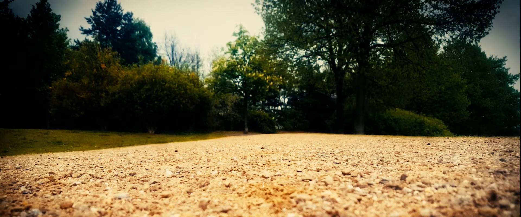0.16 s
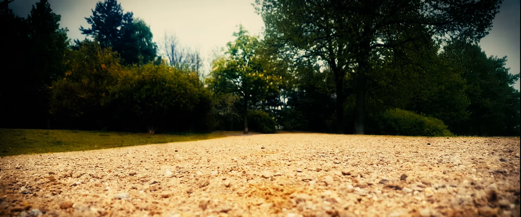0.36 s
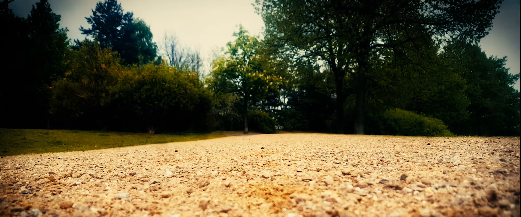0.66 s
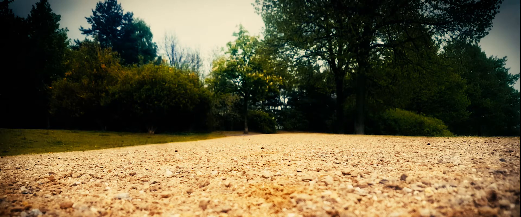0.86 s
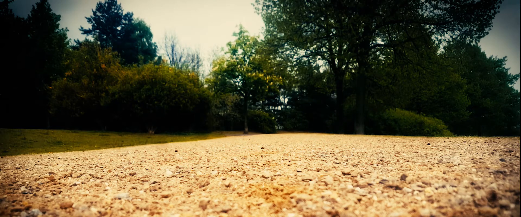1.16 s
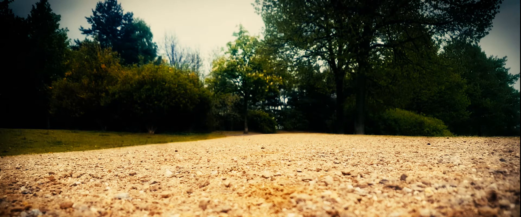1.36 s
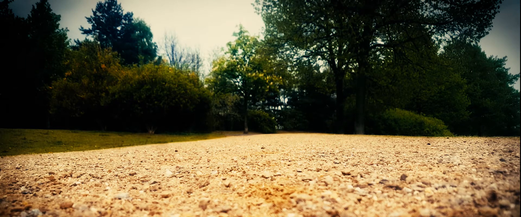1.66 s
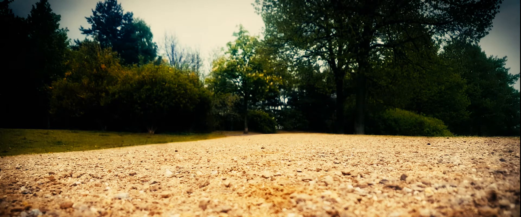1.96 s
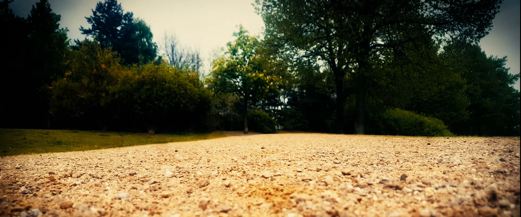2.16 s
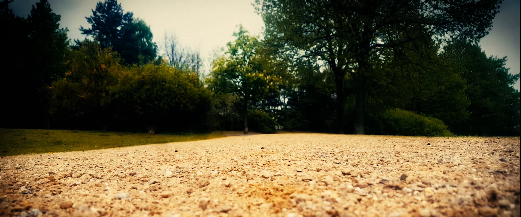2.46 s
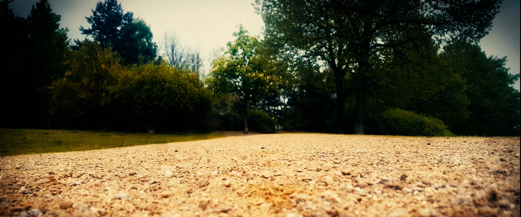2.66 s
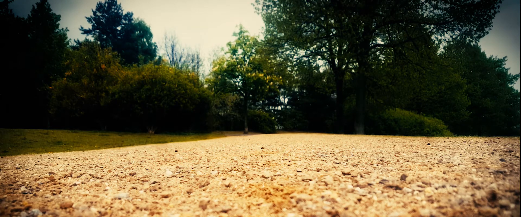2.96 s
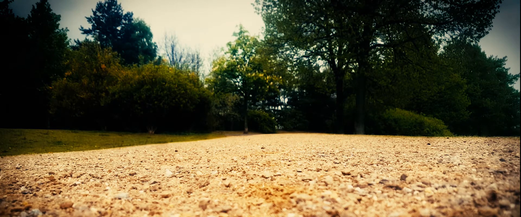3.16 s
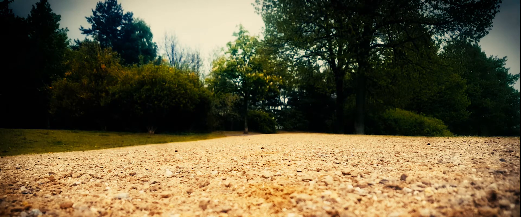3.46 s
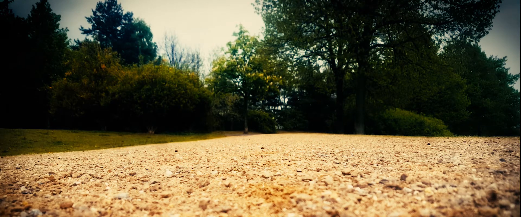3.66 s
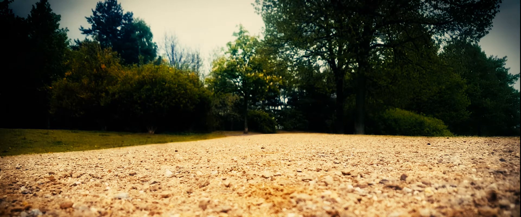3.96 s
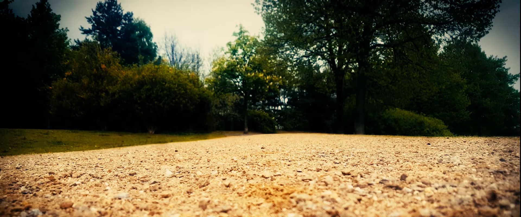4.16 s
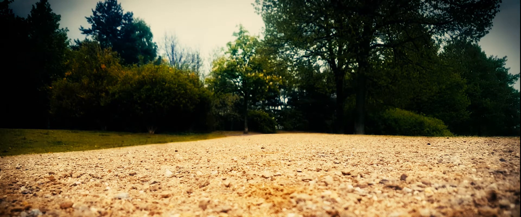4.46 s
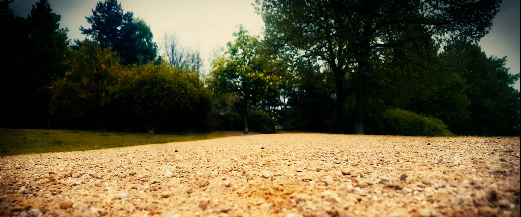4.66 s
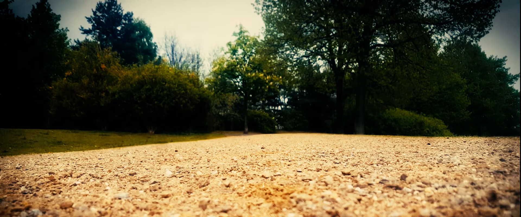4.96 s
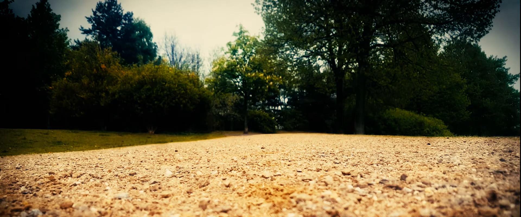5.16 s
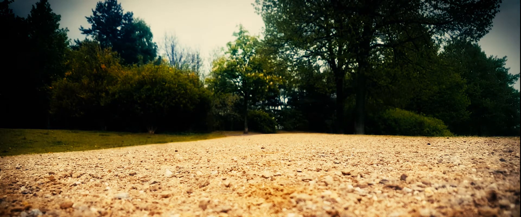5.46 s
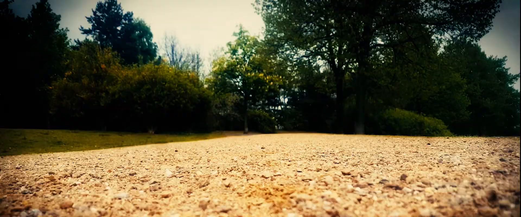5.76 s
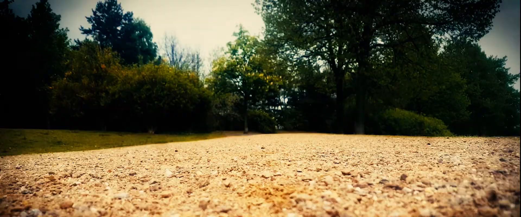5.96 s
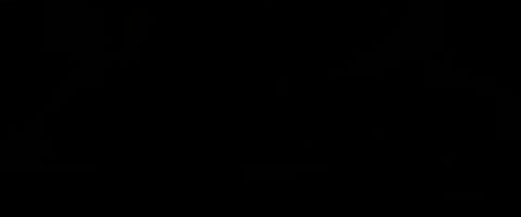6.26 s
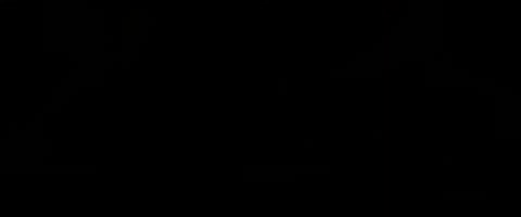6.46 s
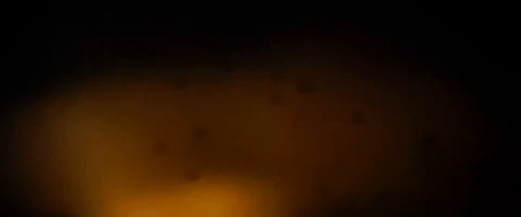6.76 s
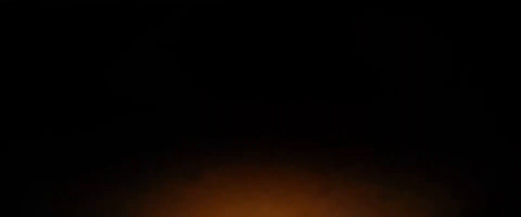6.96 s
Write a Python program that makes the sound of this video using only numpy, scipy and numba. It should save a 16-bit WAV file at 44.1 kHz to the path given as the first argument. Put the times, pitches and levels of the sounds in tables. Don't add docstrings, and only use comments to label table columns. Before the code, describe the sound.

Short rising gear whines and spraying grit in a quiet park, growing nearer until a loud thud and scraping, rattling tumble across pebbles.

```python
import sys
import numpy as np
from scipy import signal
from scipy.fft import rfft, irfft
from scipy.io import wavfile
from scipy.ndimage import uniform_filter1d, map_coordinates
from numba import njit

SR = 44100
rng = np.random.default_rng(int(sys.argv[2]) if len(sys.argv) > 2 else 0)


def linear_from_db(decibels):
    return 10 ** (np.asarray(decibels, float) / 20)


def int16_out(signal):
    q = np.round(np.clip(np.atleast_2d(signal).T, -1, 1) * 32767)
    wavfile.write(sys.argv[1], SR, q.astype(np.int16))


N = 313928
TIME = np.arange(N) / SR
TOP_HZ = 15950
HEAD_ON_S = 4.4
IMPACT_S = 6.045
BOTH_WAYS = np.array([[1], [-1]])


def rms_one(x):
    return x / np.sqrt(np.mean(x ** 2) + 1e-20)


def in_time(rows):
    s, *columns = np.transpose(rows)
    return [np.interp(TIME, s, c) for c in columns]


def since(start_s):
    return np.clip(TIME - start_s, 0, 1)


def gate(start_s, end_s, edge_s):
    return np.clip(np.minimum(TIME - start_s, end_s - TIME) / edge_s + .5, 0, 1)


def sides(pan_db):
    return linear_from_db(BOTH_WAYS * pan_db / 2)


def add(out, s, burst):
    i = round(s * SR)
    out[..., i:i + burst.shape[-1]] += burst[..., :N - i]


def sine(hz):
    return np.sqrt(2) * np.sin(2 * np.pi * np.cumsum(hz + np.zeros(N)) / SR)


def ringing(hz, t60, rise_s):
    t = np.arange(int(t60 * SR)) / SR
    return np.sin(2 * np.pi * hz * t) * linear_from_db(-60 * t / t60) * (1 - np.exp(-t / rise_s))


def drift(rate):
    r = np.exp(-40 * np.pi * rate / SR)
    slow = signal.lfilter([1], [1, -2 * r, r * r], rng.standard_normal(N // 20 + 2002))[2000:]
    return np.interp(np.arange(N) / 20, np.arange(len(slow)), rms_one(slow))


def grains(per_s, spread_db, clump_db, hiss, alike):
    clumps = linear_from_db(clump_db * drift(27))
    sizes = linear_from_db(spread_db * np.minimum(rng.exponential(1, (3, N)), 5))
    sizes = sizes * rng.choice([-1, 1], (3, N))
    clicks = rms_one(sizes * (rng.random((3, N)) < per_s * clumps / SR))
    shared, *own = clicks + hiss * clumps * rng.standard_normal((3, N))
    alike = np.clip(alike, 0, 1)
    return np.sqrt(alike) * shared + np.sqrt(1 - alike) * np.array(own)


@njit
def resonate(x, hz, r):
    out = np.zeros_like(x)
    for c in range(x.shape[0]):
        for i in range(2, x.shape[1]):
            push = x[c, i] - x[c, i - 2]
            out[c, i] = push + 2 * r * np.cos(2 * np.pi * hz[i]) * out[c, i - 1] - r * r * out[c, i - 2]
    return out


def narrow(x, hz, width_hz):
    r, cycles = np.exp(-np.pi * width_hz / SR), hz / SR + np.zeros(N)
    return rms_one(resonate(resonate(x, cycles, r), cycles, r))


# pitch in Hz, width in Hz, lift in dB.
SHELL_RINGS = [(1530, 270, 24.5), (2530, 330, 10), (4700, 610, 9.5), (5370, 240, 2), (6000, 170, 3),
               (6890, 810, 14), (9630, 280, 7), (12040, 350, 9.5), (14900, 810, 8)]


def shell_db(hz):
    return sum(db / (1 + ((hz - f) / width) ** 2) for f, width, db in SHELL_RINGS)


def colour(x, points, shell=0):
    hz = np.maximum(np.arange(N // 2 + 1) * SR / N, 1)
    f, db = np.transpose(points)
    shape = np.interp(np.log(hz), np.log(f), db, left=-200, right=-200)
    return rms_one(irfft(rfft(x) * linear_from_db(shape + shell * shell_db(hz)), N))


# time in seconds, drone level in dB, hum level in dB.
FAR_ENGINES = [(0.0, -32.5, -61), (0.73, -46, -53), (0.97, -40.5, -47.5), (1.85, -52, -58),
               (2.44, -45, -41.5), (2.51, -33.5, -42), (2.96, -34, -52.5), (4.41, -39, -47),
               (5.4, -46, -46), (5.6, -43, -60), (6.0, -35, -62), (6.5, -46, -62)]
# pitch in Hz, level in dB per Hz.
AIR_TONE = [(12, -50), (20, -17.5), (86, -1), (263, -6.5), (349, -12.5), (412, -10.5), (577, -11),
            (1500, -11.5), (2930, -46), (10600, -54), (14900, -50), (16200, -69)]


def park():
    drone_db, hum_db = in_time(FAR_ENGINES)
    far, near = grains(100, 1.4, 0.81, 30, 0.83), rng.standard_normal((2, N))
    low, high = (signal.butter(2, 2500, kind, fs=SR, output="sos") for kind in ("low", "high"))
    mixed = signal.sosfilt(low, rms_one(far)) + signal.sosfilt(high, near)
    air = colour(mixed, AIR_TONE) * linear_from_db(-43.0) * sides(1.6)
    drone_hz = 81 * (1 + 0.12 * drift(0.5))
    drone = narrow(rng.standard_normal((1, N)), drone_hz, 41.0) * linear_from_db(drone_db - 12.0)
    hum = narrow(rng.standard_normal((1, N)), 409.2, 6.1) * linear_from_db(hum_db - 6.5)
    return (air + drone + hum) * linear_from_db(np.interp(TIME, [6.0, 6.3, 7.12], [0, -8, -12]))


# start and end in seconds, then shell rumble, stone spray and fine grit in dB.
THROTTLE = [(-0.01, 0.429, -54.5, -65, -67.5), (0.57, 0.78, -57, -70, -70), (0.852, 1.3, -50, -59.5, -60.5),
            (1.467, 1.614, -49, -64, -65.5), (1.784, 1.966, -48.5, -61.5, -66.5),
            (2.29, 2.524, -47.5, -60, -65), (2.616, 2.889, -43, -58, -58),
            (3.242, 3.441, -42.5, -54.5, -54), (3.578, 3.749, -44.5, -54, -53.5),
            (3.907, 4.052, -41.5, -52, -56), (4.42, 4.604, -46, -58, -70),
            (4.791, 4.946, -39.5, -51.5, -67.5), (5.08, 5.721, -36.5, -41.5, -68),
            (5.764, 6.054, -40, -37.5, -63)]
# time in seconds, lift in dB.
NEARING = [(5.1, 3), (5.3, 5), (5.45, 7.5), (5.7, 6.5), (5.88, 2.5), (6.05, 4)]
SWELL_DB = [2, 7, 7.5]
DEPTH_DB = [34, 22, 29.5]
IDLE_DB = [-90, -65.5, -97]
NEAR_SHARE = [0.9, 1.54, 1.4]


def effort():
    attack_s, release_s, lift_s = 0.047, 0.21, 0.055
    out = np.outer(IDLE_DB, np.ones(N))
    for t0, t1, *levels_db in THROTTLE:
        times = [t0 - attack_s, t0, t1 - lift_s, t1 - lift_s + release_s]
        for k, db in enumerate(levels_db):
            curve_db = [-DEPTH_DB[k], -SWELL_DB[k], 0, -DEPTH_DB[k]]
            out[k] = np.maximum(out[k], db + np.interp(TIME, times, curve_db, left=-99, right=-99))
    out += np.outer(NEAR_SHARE, in_time(NEARING)[0])
    out[2] += 29 * since(5.39)
    return out


def shell_rumble(rumble_db, mesh_hz):
    rumble_hz = 1900 - 0.0972 * uniform_filter1d(mesh_hz, size=1500)
    shaking = grains(2500, 0.99, 2.4, 1.97, 0.91)
    body = narrow(shaking, rumble_hz, 380) + 0.4 * narrow(shaking, 0.98 * rumble_hz, 85)
    panel = narrow(shaking, 2365, 66) * (TIME > HEAD_ON_S)
    return linear_from_db(rumble_db - 1.5) * body + linear_from_db(rumble_db - 21.0) * panel


# pitch in Hz, level in dB per Hz.
TYRE_TONE = [(250, -6), (450, -8.5), (750, -2), (1150, -6.5)]


def tyres(rumble_db):
    below_db = np.interp(TIME, [0, 4.2, 4.9, 5.5], [5.0, 7.0, 12.3, 10.4])
    return colour(grains(900, 0.56, 1.9, 1.16, 0.94), TYRE_TONE) * linear_from_db(rumble_db - below_db)


# pitch in Hz, level in dB per Hz.
SPRAY_TONE = [(1900, -61), (2300, -13.5), (3500, -9), (4000, -22.5)]
SAND_TONE = [(3400, -21), (3900, -5), (7500, -14.5), (8300, -15.5), (10500, -35)]
GRIT_TONE = [(7400, -34), (8200, -26.5), (15800, -32.5)]


def stone_spray(spray_db, grit_db):
    stones = grains(2700, 4.0, 2.7, 0.93, 0.65)
    coarse = colour(stones, SPRAY_TONE, shell=0.71)
    sand = linear_from_db(0.49 * grit_db + 4.0) * colour(stones, SAND_TONE, shell=0.91)
    side_on, head_on = (colour(stones, GRIT_TONE, shell=share) for share in (1.0, 0.18))
    grit = linear_from_db(grit_db) * np.where(TIME < HEAD_ON_S, side_on, head_on)
    return linear_from_db(spray_db - 9.0) * (coarse + sand + grit)


# time in seconds, lowest pitch in Hz, lift in dB.
CATCHES = [
    (5.2, 2950, 16),
    (5.26, 3350, 10),
    (5.445, 3150, 19),
    (5.515, 3000, 21),
    (5.65, 3050, 20),
    (5.71, 2800, 21),
]


def catches():
    sag_s, recover_s = .03, .012
    shape = [np.exp(-((TIME - s) / np.where(TIME < s, sag_s, recover_s)) ** 2) for s, *_ in CATCHES]
    drop_hz = sum(x * (SPINS[-1][4] - hz) for x, (_, hz, _) in zip(shape, CATCHES))
    lift_db = sum(np.sqrt(x) * db for x, (*_, db) in zip(shape, CATCHES))
    blur_db = 13 * np.clip((TIME - 5.15) / .1, 0, 1) ** .5
    return drop_hz, lift_db - blur_db


# start and fastest moment in seconds, gear pitch at start, at fastest and at the end in Hz.
SPINS = [(.07, .22, 4500, 6900, 4600), (.66, .72, 4650, 5000, 4400), (.875, 1.02, 4400, 5840, 6200),
         (1.545, 1.57, 4240, 4540, 4350), (1.81, 1.91, 2900, 5730, 4270), (2.31, 2.445, 1490, 5930, 4550),
         (2.655, 2.805, 2300, 6650, 4700), (3.23, 3.375, 1354, 4830, 4166), (3.57, 3.75, 2020, 6070, 5970),
         (3.89, 4.02, 1770, 6530, 4760), (4.455, 4.5, 1497, 2935, 1426), (4.815, 4.866, 1500, 2870, 2420),
         (5.085, 5.148, 1463, 3380, 3450)]
LEAD_S = [0, .06, .07, 0, 0, 0, .01, 0, 0, 0, 0, 0, 0]


def spin():
    rise_bend, rounding, fall_bend = 0.93, .14, 1.5
    hunt_hz, hunt_period_s, hunt_decay_s = 520, .056, .1
    hz = np.full(N, SPINS[0][2], float)
    for (t0, t1, from_hz, top_hz, to_hz), (_, end, *_), lead in zip(SPINS, THROTTLE, LEAD_S):
        part = np.clip((TIME - t0) / (t1 - t0), 0, 1)
        up = part ** rise_bend + rounding * np.sin(np.pi * part)
        down = np.clip((TIME - t1) / max(end - t1, .01), 0, 1) ** fall_bend
        age = np.maximum(TIME - t1, 0)
        catch = hunt_hz * np.sin(np.pi * age / hunt_period_s) ** 2 * np.exp(-age / hunt_decay_s)
        catch = catch * (t0 == SPINS[-2][0])
        pitch = from_hz + (top_hz - from_hz) * up + (to_hz - top_hz) * down - catch
        hz = np.where(TIME > t0 - lead - .02, pitch, hz)
    wander = .015 * drift(12.2) * np.clip((TIME - SPINS[-1][1]) / .15, 0, 1)
    return hz * (1 + wander) - catches()[0]


WHINE_DB = [-72, -71, -65, -62, -61, -64, -64, -57, -60, -65, -59, -52, -51]
MULTIPLES_DB = [-1, -9, -17]


def gears(mesh_hz, grit_db):
    wobble = .009 * drift(40) + .011 * drift(250)
    wobble = 1 + wobble * np.maximum(mesh_hz / 3000, 1)
    on = sum(gate(spun[0] - lead, burst[1], 0.014) * linear_from_db(db)
             for spun, burst, db, lead in zip(SPINS, THROTTLE, WHINE_DB, LEAD_S))
    out = np.zeros(N)
    for k, db in enumerate(MULTIPLES_DB, 1):
        hz = k * mesh_hz
        dulled = np.clip((hz - 3600) / 1200, 0, 1) * (1.15 * grit_db + 2) * (k > 1)
        dulled = dulled - 5 * np.clip((hz - 3200) / 1500, 0, 1) - 7 * np.exp(-((hz - 3650) / 450) ** 2)
        dulled = dulled + 9 * (k > 1) * np.clip(hz / 1000 - 7.5, 0, 1)
        flutter_db = np.clip(mesh_hz / 900 - .5, 1.5, 4.5) * drift(35) + 3.5 * drift(300)
        gain = linear_from_db(db - 11.0 + dulled + 1.14 * shell_db(hz) + flutter_db)
        out += gain * sine(hz * wobble) * (hz < TOP_HZ)
    return out * on * linear_from_db(in_time(NEARING)[0] + catches()[1])


# start and end in seconds, level in dB.
NOTES = [(0.54, 0.705, -61.5), (0.96, 1.284, -63), (1.774, 1.917, -60), (2.285, 2.444, -53),
         (3.25, 3.396, -58), (3.596, 3.714, -46.5), (3.895, 3.986, -51), (4.416, 4.583, -49.5),
         (4.78, 4.954, -47), (5.069, 5.447, -43), (5.466, 5.734, -48)]


def controller_note():
    held = sum(gate(t0, t1, 0.029) * linear_from_db(db) for t0, t1, db in NOTES)
    return held * sine(1956 * (1 + 0.00315 * drift(33.5))) * linear_from_db(3.0 * drift(30))


def car():
    rumble_db, spray_db, grit_db = effort()
    grit_db = grit_db - spray_db
    mesh_hz = spin()
    whine = gears(mesh_hz, grit_db)
    rolling = shell_rumble(rumble_db, mesh_hz) + tyres(rumble_db) + stone_spray(spray_db, grit_db)
    return rolling * gate(0, THROTTLE[-1][1], 0.023) + controller_note() + whine


# start and end in seconds, first and last pitch in Hz, level in dB.
BIRDS = [
    (0.738, 0.79, 8700, 7240, -72),
    (0.88, 1.005, 8500, 5900, -71),
    (1.3, 1.43, 7700, 5850, -72),
    (4.285, 4.347, 3730, 3740, -70),
    (4.744, 4.799, 3660, 3730, -61),
    (4.8, 4.83, 8800, 8200, -60),
]


def birds():
    out, warble = 0, 1 + .008 * drift(150)
    for t0, t1, from_hz, to_hz, db in BIRDS:
        part = np.clip((TIME - t0) / (t1 - t0), 0, 1)
        whistle = sine((from_hz + (to_hz - from_hz) * part) * warble)
        out = out + gate(t0, t1, 0.0096) * linear_from_db(db + 5 * part) * whistle
    return out * linear_from_db(3 * drift(50)) + linear_from_db(-17) * np.roll(out, round(.025 * SR))


# time in seconds, peak level in dB.
TICKS = [(2.219, -56), (3.517, -48), (3.572, -54), (5.645, -38), (6.0635, -26), (6.175, -11), (6.187, -14),
         (6.227, -22), (6.2395, -11), (6.257, -22), (6.372, -17), (6.376, -11), (6.394, -17), (6.404, -11),
         (6.411, -22), (6.4515, -16), (6.4755, -19), (6.554, -20), (6.561, -21), (6.569, -21),
         (6.5965, -16), (6.608, -25), (6.645, -28), (6.65, -28), (6.668, -34), (6.683, -30), (6.722, -37),
         (6.792, -33), (6.815, -28), (6.8345, -28), (6.853, -29), (6.886, -27), (6.905, -30), (6.911, -29),
         (6.921, -26), (6.976, -28), (7.0, -37), (7.014, -35), (7.024, -35), (7.0376, -34), (7.042, -36),
         (7.065, -46), (7.072, -45), (7.082, -45), (7.0884, -44), (7.102, -43)]


def ticks():
    out, t = np.zeros((2, N)), np.arange(round(.01 * SR)) / SR
    cracks = TICKS + [(s + 0.0032, db - 23.0) for s, db, *_ in KNOCKS]
    for (s, db), noise in zip(cracks, rng.standard_normal((len(cracks), 2, len(t)))):
        bright = signal.lfilter([1, -1], [1, -.88], noise[0] + 1.73 * noise)
        add(out, s, linear_from_db(db - 60 * t / 0.0056) * bright / 2)
    return out


# time in seconds, peak level in dB, pitch in Hz.
WHEEL_STONES = [(2.2203, -45, 1630), (2.274, -34.5, 1483), (2.758, -32, 1434), (3.2349, -38, 1685),
                (3.518, -42.5, 1708), (3.519, -50, 2200), (3.519, -57, 4320), (2.221, -63, 4380),
                (3.579, -48, 1750), (4.3984, -41, 1860), (4.78, -36, 1905), (5.0822, -31, 1465),
                (5.509, -38.5, 1693), (5.701, -27, 1430), (2.646, -50.5, 2450), (5.073, -44.5, 2500)]


def wheel_stones():
    out = np.zeros(N)
    for s, db, hz in WHEEL_STONES:
        add(out, s - .001, linear_from_db(db + 12.5) * ringing(hz, 0.029, 0.0017))
    return out


# time in seconds, drag level in dB.
DRAG = [(5.7, -33.5), (5.976, -26.5), (6.04, -25.5), (6.074, -25), (6.17, -21.5), (6.296, -30.5),
        (6.434, -28), (6.572, -31.5), (6.9, -33.5), (7.119, -36.5)]


def drag_levels():
    scrape_db, = in_time(DRAG)
    settle_db = 87 * since(7.025)
    grit_db = scrape_db - 5 - 134 * np.clip(6.1 - TIME, 0, 1) - settle_db
    grit_db = grit_db - 4.8 * np.clip((TIME - 6.99) / .005, 0, 1)
    return scrape_db, scrape_db - 1 - settle_db, grit_db


# pitch in Hz, level in dB per Hz.
CASE_TONE = [(150, -50), (250, -20.5), (398, -14), (539, -17), (612, -11.5), (1250, -15), (1620, -20.5),
             (2750, -120)]


def case_rumble(case_db):
    airborne = TIME < IMPACT_S
    shaking = grains(400, 5.05, 2.8, 0.85, np.where(airborne, 0.9, 0.36))
    return colour(shaking, CASE_TONE) * linear_from_db(case_db + 1.0 + 2.1 * airborne)


def port_boom(case_db):
    shaking = grains(92, 2.4, 6.7, 1.4, 0.63) * BOTH_WAYS
    boom = colour(shaking, [(25, -36), (70, -5.0), (140, 9.5), (250, 11.0), (380, -7.0)])
    calm_db = 2 * np.clip(TIME - IMPACT_S, 0, 2)
    return boom * linear_from_db(case_db - 1.5 - calm_db - 8.5 * (TIME < IMPACT_S))


def patchy(x, depth_db, rate):
    edges = 400 * 2 ** np.arange(0, 5.6, .5)
    out = 0
    for k, pair in enumerate(zip(edges, edges[1:])):
        band = signal.sosfilt(signal.butter(2, pair, "band", fs=SR, output="sos"), x)
        out = out + (-1) ** k * band * linear_from_db(depth_db * drift(rate))
    return out


# time in seconds, peak level in dB, length in seconds, grit beside it in dB.
GRAVEL_BURSTS = [(5.987, -8.5, 0.0074, -20), (6.028, -23, 0.012, -18), (6.057, -1.5, 0.014, 9.5),
                 (6.068, 0, 0.005, 9), (6.172, -8, 0.0058, -4), (6.215, -2, 0.0091, -26),
                 (6.251, -8, 0.024, 11), (6.272, 9.5, 0.024, -2.5), (6.298, 4, 0.025, 1.5),
                 (6.324, 8.5, 0.027, -2.5), (6.366, 0.5, 0.028, -3), (6.425, -5, 0.011, 12),
                 (6.469, 0, 0.022, -13), (6.492, -0.5, 0.035, -1), (6.544, -12, 0.026, 12.5),
                 (6.584, 9.5, 0.02, -19), (6.687, -22, 0.02, 13), (6.715, -25, 0.013, -28),
                 (6.747, -30, 0.016, 3), (6.794, -32, 0.018, 2), (6.83, -28, 0.017, 5.5),
                 (6.894, -23, 0.022, 11), (6.972, -16, 0.014, 0)]
# pitch in Hz, level in dB per Hz.
SCRAPE_TONE = [(650, -30), (1100, -5), (1460, 0), (1720, 6), (2110, 5), (2530, 2.5), (3010, -1),
               (4140, -15), (5200, -32), (6760, -80), (11400, -120)]
FLINT_TONE = [(3000, -6), (3700, 4), (5000, -8), (6500, -19)]
DUST_TONE = [(2820, -5.5), (4800, -3), (5560, -1), (10700, -9.5), (12800, -7.5), (15200, -9), (16200, -24)]


def scraping(scrape_db, grit_db):
    scrape_gain, grit_gain = linear_from_db(scrape_db + 2.5 - 1.56 * (TIME < 6.3)), linear_from_db(grit_db + 5.0)
    for s, db, length_s, bright_db in GRAVEL_BURSTS:
        age = np.arange(round(.12 * SR)) / SR / np.clip(length_s, .001, .02)
        swell = age * np.exp(1 - 3 * age) * 3
        add(scrape_gain, s - .002, linear_from_db(db - 29.0) * swell)
        add(grit_gain, s - .002, linear_from_db(db - 27.5 + bright_db) * swell)
    rub = grains(1800, 2.8, 2.3, 0.21, np.where(TIME < IMPACT_S, 0.9, 0.059))
    stones = colour(rub, SCRAPE_TONE) + linear_from_db(-18.5) * colour(rub, FLINT_TONE)
    hiss = 0.36 * linear_from_db(1.5 * drift(6.5)) * rng.standard_normal((2, N))
    mixed = stones * scrape_gain + colour(rub + hiss, DUST_TONE) * grit_gain
    return linear_from_db(-6.5) * patchy(mixed, depth_db=1.2, rate=34.0)


# time in seconds, length in seconds, dip in dB.
HOPS = [(6.208, .005, 7), (6.244, .003, 5), (6.305, .008, 7), (6.4, .003, 8), (6.602, .004, 6),
        (6.7, .01, 3), (6.762, .01, 4), (6.968, .006, 4), (7.003, .008, 5), (6.345, .012, 9),
        (6.444, .008, 10), (6.582, .008, 8), (6.66, .015, 5), (6.872, .009, 12), (7.06, .018, 8)]


def drag():
    scrape_db, case_db, grit_db = drag_levels()
    sliding = case_rumble(case_db) + port_boom(case_db) + scraping(scrape_db, grit_db)
    dips_db = sum(db * np.exp(-((TIME - s) / length_s) ** 2) for s, length_s, db in HOPS)
    skips = linear_from_db(drift(30.0) * (TIME > 6.05) - dips_db)
    return sliding * skips * gate(DRAG[0][0], DRAG[-1][0], 0.75 * (TIME < 6) + .001)


# time in seconds, peak level in dB, ring in Hz, left-right in dB.
KNOCKS = [(5.921, -19.5, 740, 5), (5.977, -28, 700, 17), (6.019, -18, 910, 12), (6.042, -18, 810, 24),
          (6.051, -17.5, 1120, 26), (6.123, -16, 600, 18), (6.152, -13.5, 540, 8), (6.1765, -10, 690, 9),
          (6.1815, -2.5, 715, 4), (6.198, -13, 780, 6), (6.2142, -13, 725, 4), (6.2205, -3, 670, -3),
          (6.234, -11.5, 617, 16), (6.246, -18.5, 590, -22), (6.276, -7.5, 448, 4.5), (6.293, -19, 570, 5),
          (6.325, -20, 400, -2), (6.369, -26, 504, 3), (6.382, -20, 387, -1), (6.403, -33, 720, 4),
          (6.452, -18.5, 560, 1.0), (6.476, -23, 625, -21), (6.507, -18.5, 644, 4), (6.551, -23, 390, -6),
          (6.595, -14, 523, -1), (6.629, -20, 346, -1), (6.669, -19.5, 504, 2), (6.7217, -14.5, 725, 0),
          (6.744, -28, 806, -15), (6.787, -18, 684, -5), (6.858, -36, 600, 0), (6.913, -22.5, 805, -2.0),
          (6.919, -21, 730, -6), (6.933, -26, 725, -2), (6.949, -27, 736, 1), (6.985, -26.5, 293, 0),
          (6.958, -20, 710, -3)]


def knocks():
    out, t60 = np.zeros((2, N)), 0.015
    for s, db, hz, pan_db in KNOCKS:
        ring = ringing(hz, t60, 0.0012) + 0.62 * ringing(1.446 * hz, t60, 0.0032)
        add(out, s, sides(pan_db) * linear_from_db(db + 7.5) * ring)
        add(out, s, sides(pan_db) * linear_from_db(db - 10) * ringing(3500, 0.0047, 0.0002))
    return out


# time in seconds, peak level in dB, ring in Hz.
CHIPS = [(5.9258, -15, 1570), (5.981, -11.5, 1830), (6.0308, -10, 1520), (6.0507, -9, 1470),
         (6.0662, -1, 3970), (6.0887, -21, 3270), (6.105, -19, 3780), (6.121, -16, 2730),
         (6.1424, -12, 1620), (6.175, -13, 1770), (6.183, -8, 1750), (6.1863, -23, 1690),
         (6.1974, -15, 1640), (6.213, -9, 1910), (6.2206, -11.5, 1570), (6.227, -4, 2850),
         (6.233, -12, 1850), (6.2405, -8, 3040), (6.258, -8.5, 3330), (6.2766, -29, 1800),
         (6.2801, -15, 1590), (6.294, -6.5, 2830), (6.3155, -10, 3420), (6.349, -15, 1790),
         (6.3718, -13, 2780), (6.376, -15, 1790), (6.382, -9, 3250), (6.3934, -16, 1770),
         (6.4042, -20, 1390), (6.4254, -17, 2470), (6.4304, -18, 1370), (6.4522, -22, 1440),
         (6.466, -18, 1780), (6.4777, -14, 1880), (6.4903, -16, 1340), (6.4994, -21, 3440),
         (6.5206, -22, 2070), (6.55, -16, 3620), (6.5684, -21, 1460), (6.5951, -6, 2970),
         (6.608, -19, 1770), (6.6185, -18, 1840), (6.649, -17, 3560), (6.6682, -32, 1420),
         (6.722, -18, 2310), (6.7444, -21, 1550), (6.775, -20, 1450), (6.7915, -31, 2150),
         (6.8144, -24, 1940), (6.8864, -36, 1740), (6.9137, -26, 1925), (6.9206, -15, 1800),
         (6.9494, -28, 1990), (6.9802, -17, 1850), (6.9882, -14, 1820), (7.0204, -29, 1940),
         (7.0633, -35, 2750), (7.0838, -27, 1820), (7.0928, -29, 1900), (7.101, -22, 1910)]


def chips():
    out, cycles, rise_s = np.zeros((2, N)), 26.5, 0.00055
    for (s, db, hz), (side, over) in zip(CHIPS, rng.uniform(-1.02, 1, (len(CHIPS), 2))):
        overtone = ringing((1.7 + 0.29 * over) * hz, cycles / hz, rise_s)
        ring = ringing(hz, cycles / hz, rise_s) + 0.64 * overtone
        add(out, s, linear_from_db(db - 2 + 8.4 * side * BOTH_WAYS) * ring)
    return out


# time in seconds, pitch in Hz, peak in dB, length in seconds, left-right in dB.
THUDS = [
    (6.052, 182, -13, 0.019, 3),
    (6.062, 83, -17, 0.02, 6.5),
    (6.121, 153, -27.5, 0.027, 0),
    (6.176, 80, -35, 0.015, 19),
    (6.273, 164, -29.5, 0.019, 5),
    (6.376, 152, -32.5, 0.017, -1),
    (6.973, 87.5, -39, 0.015, 1),
]


def thuds():
    out = np.zeros((2, N))
    for s, hz, db, length_s, pan_db in THUDS:
        t = np.arange(round(length_s * SR)) / SR
        push = np.sin(2 * np.pi * hz * t + 0.57 * BOTH_WAYS) * np.sin(np.pi * t / length_s) ** 0.081
        add(out, s, linear_from_db(db + 2.5) * sides(pan_db) * push)
    return out


# time in seconds, right behind left in milliseconds, left-right in dB.
BEARING = [(0, 0.44, 6), (3.5, 0.44, 6.5), (5, 0.42, 5), (5.8, 0.42, 7.5), (5.97, 0.36, 15),
           (6.05, 0.25, 28), (6.4, -0.043, 6), (6.7, -0.37, -14), (7.12, -0.11, 9)]


def scene():
    lag_ms, pan_db = in_time(BEARING)
    out = park() + (car() + wheel_stones()) * sides(pan_db) + birds() + ticks()
    left, right = out + drag() + knocks() + chips() + thuds()
    late = map_coordinates(right, [(TIME - lag_ms / 1000) * SR], order=3, mode="nearest")
    return np.array([left, late])


def roll_off(x):
    return signal.sosfilt(signal.butter(12, 16690, fs=SR, output="sos"), x)


def record(dry):
    cut = signal.ellip(12, .3, 75, TOP_HZ, fs=SR, output="sos")
    rounded = 1.1 * np.tanh(dry / 1.1)
    return roll_off(signal.sosfilt(cut, rounded))


dry = scene()
out = record(dry)
int16_out(out)
```